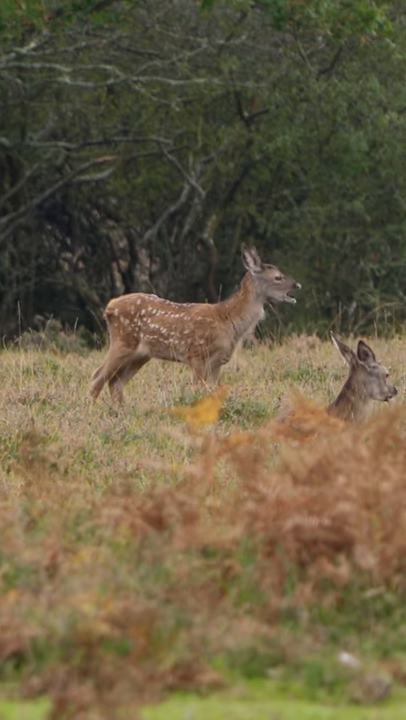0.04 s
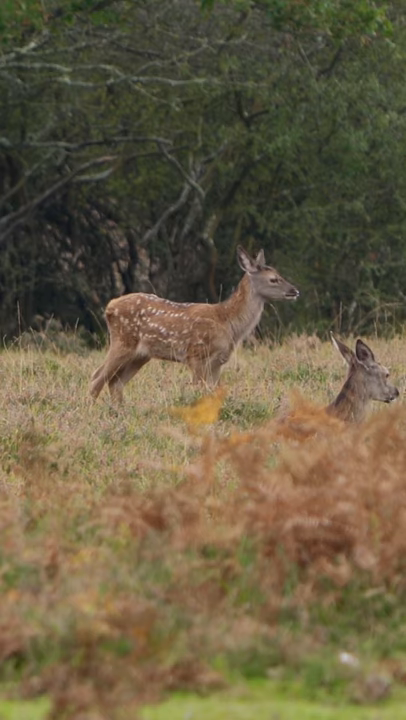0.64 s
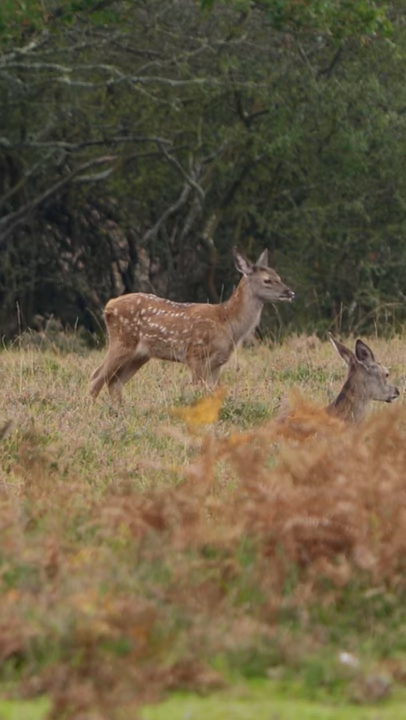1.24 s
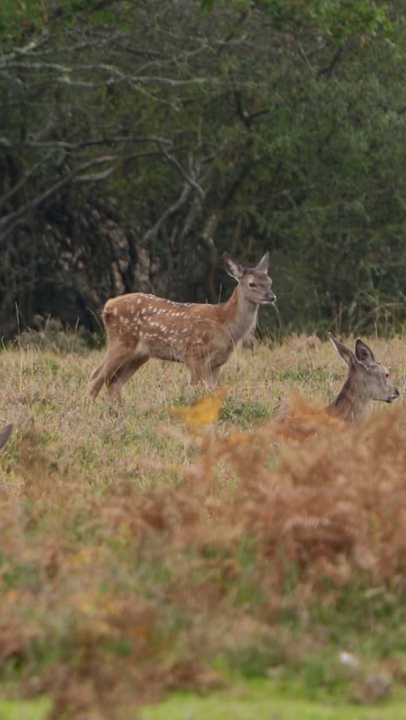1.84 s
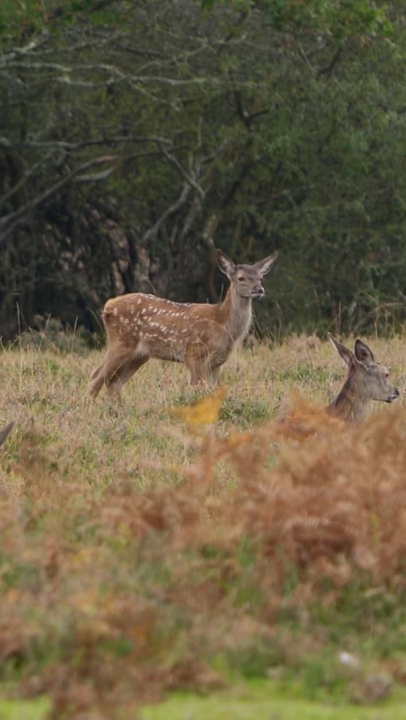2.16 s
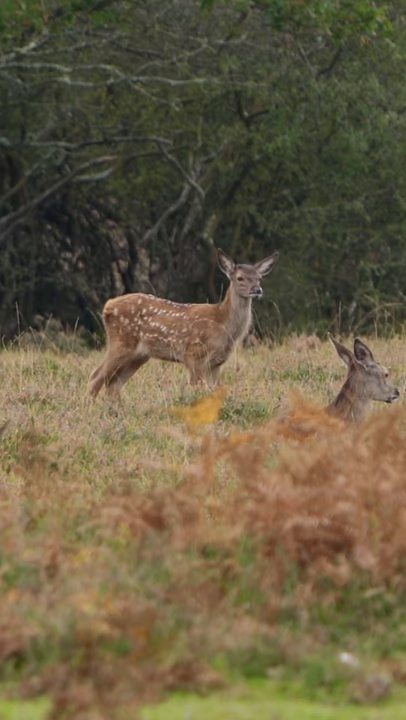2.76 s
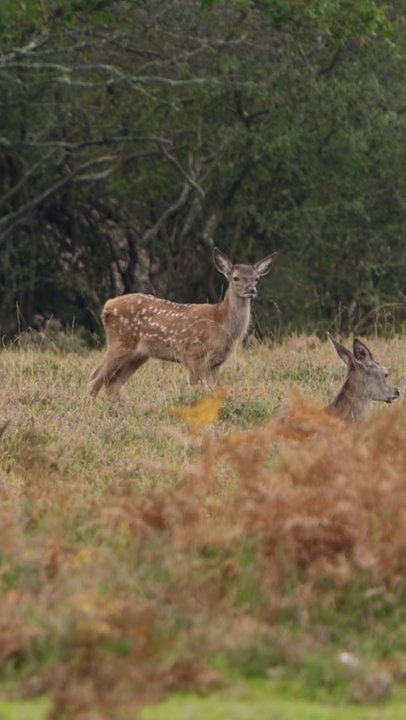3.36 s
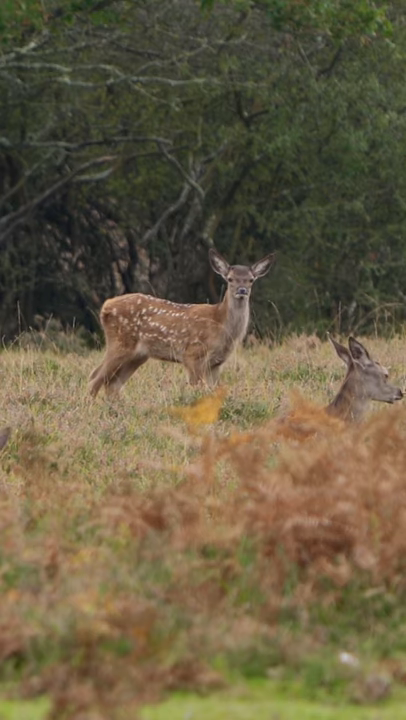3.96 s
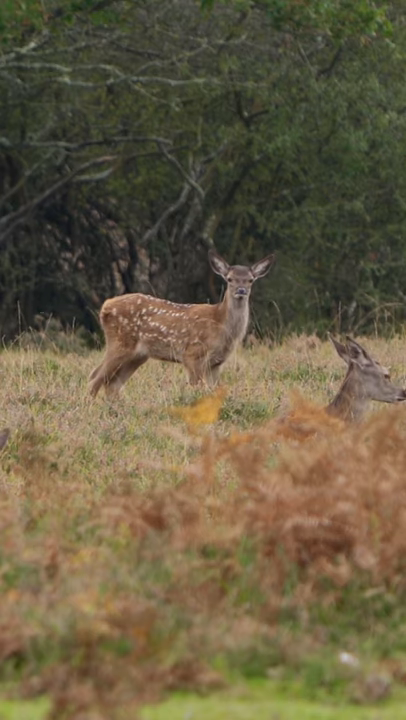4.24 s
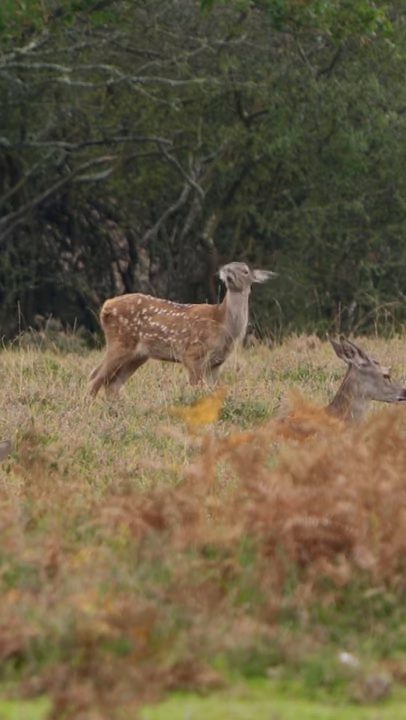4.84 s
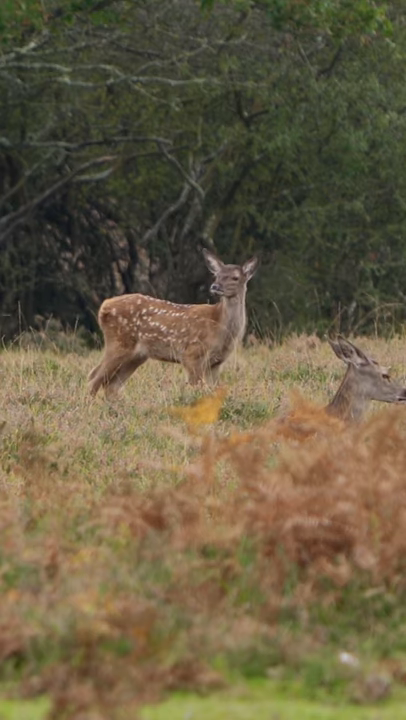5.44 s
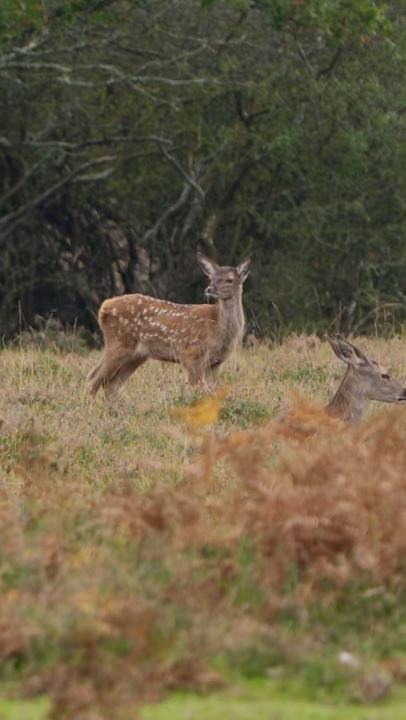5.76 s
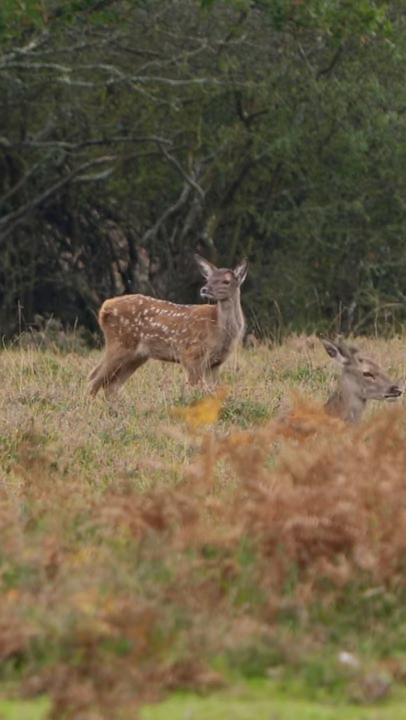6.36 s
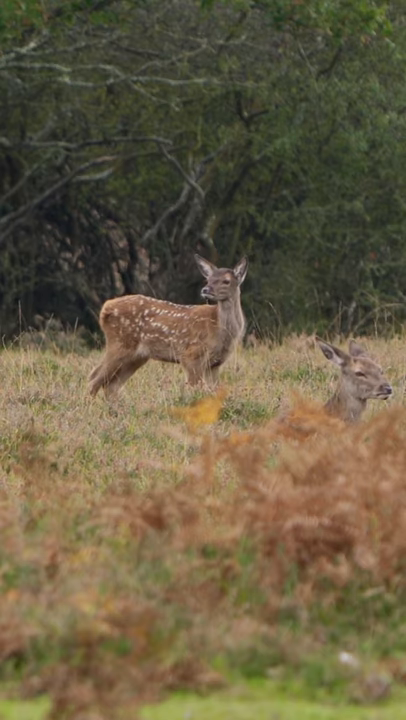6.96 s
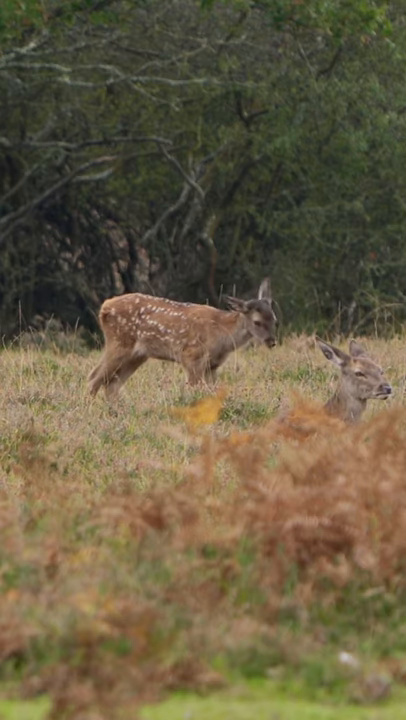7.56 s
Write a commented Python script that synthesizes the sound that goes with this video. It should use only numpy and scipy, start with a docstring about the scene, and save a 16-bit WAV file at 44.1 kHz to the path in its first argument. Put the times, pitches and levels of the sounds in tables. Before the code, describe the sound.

A nearby songbird opens with two quick warbled phrases. Another bird gives a sharp buzzy call, then the first runs through a thin, very high twitter and ends in a short reedy flourish. Farther birds whistle and tick throughout, and the buzzy call returns near the end. The notes echo lightly among trees, over a steady hiss and a faint far rush of air.

```python
"""A near songbird warbles low, runs through a thin high twitter and ends in a reedy flourish.
Another gives two sharp buzzy calls, and farther birds whistle and tick in a wood on a still day.
Each note is a gliding oscillation of the syrinx, modulated at random in pitch and level; the trees
scatter it into reverberation. A soft wash of hiss swells beneath the twitter, and under it all lie
a faint far rush of air and a steady hiss."""
import sys
import numpy as np
from scipy import signal
from scipy.fft import rfft, irfft, next_fast_len
from scipy.io import wavfile
from scipy.ndimage import map_coordinates

SR = 44100
rng = np.random.default_rng(int(sys.argv[2]) if len(sys.argv) > 2 else 0)


def materialize(psi):
    """Save the field psi as 16-bit PCM at rate SR to the path in sys.argv[1].

    A 1-D psi becomes a single channel; in a 2-D psi each row is a channel.
    """
    bounded = np.clip(np.atleast_2d(psi).T, -1, 1)
    quanta = np.round(bounded * 32767).astype(np.int16)
    wavfile.write(sys.argv[1], SR, quanta)


N = 335601


def near_songbird():
    """Close to a source the direct sound dominates; the forced flourish stirs a longer echo."""
    song = among_trees(chips() + warble() + twitter(), direct_db=0.13,
                       branches=(-14.5, 0.22, 0.44), wood=(-20, 0.62, 0.7))
    ending = among_trees(flourish(), direct_db=-0.7, branches=(-13, 0.25, 0.16), wood=(-20, 1.0, 0.5))
    return song + ending


def chips():
    """Brevity and fast modulation widen a tone's band: scratchy chips open each warble phrase."""
    # chips: start_s, length_s, level_db, first_hz, last_hz
    chip_notes = [(.060, 0.0059, -37, 4050, 4200), (.081, 0.0051, -38, 3690, 4660),
                  (.302, 0.0074, -45, 4000, 3240), (.309, 0.0068, -38.5, 3840, 3630),
                  (.325, 0.0047, -45, 4070, 4670)]
    return sing(glides(chip_notes, bend=1.0), edge_s=0.0031, waver=0.029, waver_per_s=1100,
                flutter_db=3.0, overtones_db=(-24,), rasp_db=-35)


def warble():
    """Nearly sinusoidal oscillation of the syrinx: two phrases of hook, swell and fading tail."""
    # hooks that leap up and sag: start_s, length_s, level_db, first_hz, last_hz
    hooks = [(.086, 0.032, -26.5, 4500, 4014), (.329, 0.031, -30.5, 4450, 3627)]
    # swelling whistles: same columns
    swells = [(.139, .062, -26.5, 4420, 4760), (.370, .066, -28, 3820, 4200)]
    # tails, overlapping where both sides of the syrinx sound: same columns
    tails = [(.200, 0.032, -37, 4980, 4520), (.419, .054, -40.5, 4580, 4744),
             (.436, 0.026, -40, 4060, 3804), (.472, .017, -37, 4870, 4350)]
    notes = (glides(hooks, bend=2.4, attack=0.38, rise_db=1, release=0.6, fall_db=11, scoop=0.2)
             + glides(swells, bend=4.13, attack=0.82, rise_db=11.5, release=0.18, fall_db=6)
             + glides(tails, bend=0.9, attack=0.13, rise_db=0.5, release=1.0, fall_db=6.5, scoop=0.033))
    return sing(notes, edge_s=0.0021, waver=0.0022, waver_per_s=450,
                flutter_db=1.5, overtones_db=(-30, -40), rasp_db=-32.5)


def twitter():
    """A high fundamental almost free of harmonics sounds thin: a quaver, then slurs and pips."""
    # quavering lead-in: time_s, pitch_hz, level_db
    quaver = [(2.932, 7103, -41.5), (2.946, 7680, -37), (2.956, 7203, -36.5), (2.974, 6980, -29.5),
              (2.986, 7590, -32), (3.009, 7270, -25)]
    # swelling slurs: start_s, length_s, level_db, first_hz, last_hz
    slurs = [(3.011, 0.059, -24, 7390, 7680), (3.135, 0.066, -30.5, 6994, 7340),
             (3.304, 0.059, -22, 7560, 7320), (3.371, 0.035, -24, 7560, 7750),
             (3.491, 0.028, -26.5, 8110, 7420), (3.507, 0.05, -26, 7320, 7760)]
    # higher, abrupt pips: same columns
    pips = [(3.102, 0.024, -21, 8030, 8240), (3.208, 0.037, -23, 7870, 7760),
            (3.272, 0.026, -23.5, 7890, 8095), (3.410, 0.026, -22.5, 7740, 7900),
            (3.463, .028, -23.5, 8020, 8210), (3.562, .051, -19.5, 7845, 7550)]
    notes = ([winding(quaver)]
             + glides(slurs, bend=1.2, attack=0.72, rise_db=9.5, release=0.16, fall_db=4, droop=0.025)
             + glides(pips, bend=0.98, attack=0.15, rise_db=4, release=0.55, fall_db=5.5,
                      scoop=0.0073, droop=0.039))
    return sing(notes, edge_s=0.0059, waver=0.0088, waver_per_s=221,
                flutter_db=1.86, overtones_db=(-34,), rasp_db=-58)


def flourish():
    """Forcing the syrinx strengthens its harmonics and rasp, so the timbre turns reedy."""
    # two long notes, a curve each: time_s, pitch_hz, level_db
    reedy_curves = [
        [(3.694, 3219, -52.5), (3.702, 3435, -34), (3.712, 3210, -32), (3.716, 3230, -30.5), (3.724, 4017, -36),
         (3.732, 3469, -38.5), (3.74, 3370, -38.5), (3.75, 3750, -32.5), (3.758, 3800, -38.5)],
        [(3.813, 3900, -33.5), (3.823, 3287, -30.5), (3.833, 3037, -31), (3.841, 2885, -42), (3.853, 2755, -35),
         (3.859, 2724, -35.5), (3.869, 3055, -38), (3.879, 2930, -55.5), (3.885, 2860, -51)],
    ]
    # quick flicks between and after them: start_s, length_s, level_db, first_hz, last_hz
    flicks = [(3.767, 0.0052, -32.5, 3770, 3440), (3.798, 0.0091, -45.5, 2620, 3200),
              (3.927, .016, -40, 2590, 3960)]
    notes = [winding(curve) for curve in reedy_curves]
    notes += glides(flicks, bend=-0.38, attack=0.76, rise_db=6.5)
    return sing(notes, edge_s=0.0014, waver=0.016, waver_per_s=850,
                flutter_db=1.34, overtones_db=(-25, -16.5, -14.5, -21), rasp_db=-26.5)


def syrinx(pitch, levels_db, edge_s, waver, waver_per_s, flutter_db, overtones_db=(), rasp_db=-90):
    """An oscillator under random frequency and amplitude modulation, with harmonics and air noise."""
    pitch, levels_db = (np.pad(v, int(edge_s * SR / 2), mode="edge") for v in (pitch, levels_db))
    t = np.arange(len(pitch)) / SR
    hz = pitch * (1 + waver * wander(t, waver_per_s))
    phase = 2 * np.pi * np.cumsum(hz) / SR
    tone = np.sin(phase)
    for k, level_db in enumerate(overtones_db, 2):
        tone += from_db(level_db + 2 * wander(t, waver_per_s)) * np.sin(k * phase) * (k * hz < SR / 2)
    air = np.diff(rng.standard_normal(SR // 2), 2)[:len(t)] / 2   # differencing favours the treble
    opening = np.sin(np.pi / 2 * np.clip(np.minimum(t, t[-1] - t) / edge_s, 0, 1)) ** 2
    gain = from_db(levels_db + flutter_db * wander(t, waver_per_s / 2))
    return np.sqrt(2) * gain * opening * (tone + from_db(rasp_db) * air)


def glides(rows, bend, attack=0.3, rise_db=0, release=0.3, fall_db=0, scoop=0, droop=0, lift=0):
    """Exponential glides as notes (start, pitch, levels, ...); more bend settles the pitch sooner.
    Attack and release are fractions of the length; scoop, droop and lift, of the pitch."""
    scoop_s, droop_s = 0.0022, 0.003
    notes = []
    for start, length, level_db, first_hz, last_hz, *rest in rows:
        t = np.arange(int(length * SR)) / SR
        progress = t / t[-1]
        hz = first_hz + (last_hz - first_hz) * np.expm1(-bend * progress) / np.expm1(-bend)
        scoop_in = scoop * np.exp(-t / scoop_s)
        droop_out = droop * np.exp((t - t[-1]) / droop_s)
        hz *= 1 + lift * progress ** 3 - scoop_in - droop_out
        onset_db = rise_db * np.maximum(1 - progress / attack, 0) ** 2
        ending_db = fall_db * np.maximum(1 - (1 - progress) / release, 0) ** 2
        notes.append((start, hz, level_db - onset_db - ending_db, *rest))
    return notes


def winding(curve):
    """A note whose frequency and level follow a piecewise linear contour."""
    time_s, hz, level_db = np.transpose(curve)
    t = np.arange(time_s[0], time_s[-1], 1 / SR)
    return time_s[0], np.interp(t, time_s, hz), np.interp(t, time_s, level_db)


def sing(notes, **voice):
    """One bird's notes superpose, cross-fading where they meet."""
    out = np.zeros(N)
    for start, pitch, levels_db in notes:
        add(out, start - voice["edge_s"] / 2, syrinx(pitch, levels_db, **voice))
    return out


def wander(t, per_s):
    """Smooth random modulation of roughly unit spread, through per_s values a second."""
    knots = rng.standard_normal(256)
    return map_coordinates(knots, [t * per_s], order=3, mode="wrap")


def add(track, start_s, sound):
    """Linear superposition of a sound on a track."""
    at = max(int(start_s * SR), 0)
    track[..., at:at + sound.shape[-1]] += sound[..., :N - at]


def from_db(db):
    """Amplitude ratio of a level in decibels."""
    return 10 ** (np.asarray(db) / 20)


def among_trees(sound, direct_db, branches, wood):
    """Scattering adds two exponential reverberant tails, each (level_db, t60_s, stereo_spread)."""
    t = np.arange(SR) / SR
    build_up = 1 - np.exp(-t / 0.0037)
    response = np.zeros((2, SR))
    for level_db, t60_s, spread in branches, wood:
        mid, side = rng.standard_normal((2, SR)) * build_up * from_db(-60 * t / t60_s)
        response += from_db(level_db) * (mid + spread * side * [[1], [-1]]) / np.linalg.norm(mid)
    scattered = signal.fftconvolve(np.atleast_2d(sound), response, axes=1)[:, :N]
    return from_db(direct_db) * sound + scattered


def sharp_caller():
    """Two voices slide down together and beat into a buzz, smeared by scattering in the foliage."""
    # upper voice: start_s, length_s, level_db, first_hz, last_hz
    sharp_calls = [(1.897, 0.045, -36.5, 8450, 7530), (6.843, .045, -37.5, 8350, 7570)]
    lower_delay_s, lower_ratio, lower_db = 0.0039, 0.936, -4
    upper = glides(sharp_calls, bend=2.5, attack=0.45, rise_db=6)
    lower = [(start + lower_delay_s, pitch * lower_ratio, levels_db + lower_db)
             for start, pitch, levels_db in upper]
    calls = sing(upper + lower, edge_s=0.0033, waver=0.019, waver_per_s=1000, flutter_db=3.5)
    return among_trees(from_direction(calls, pan_db=0, lag_s=-2e-5), direct_db=-1,
                       branches=(-6, 0.38, 0.24), wood=(-5, 0.69, 0.42))


def distant_birds():
    """The ratio of direct to reverberant sound falls with distance, blurring the farthest birds."""
    whistles, slurs = far_whistles(), far_slurs()
    return (among_trees(whistles, direct_db=1, branches=(-7, 1.0, 0.44), wood=(-5.5, 0.99, 0.83))
            + among_trees(slurs, direct_db=-4, branches=(-3.5, 0.3, 0.31), wood=(-2.5, 0.95, 0.9)))


def far_whistles():
    """Shallow modulation leaves nearly pure tones, each relaxing towards a pitch."""
    # settling whistles: start_s, length_s, level_db, first_hz, last_hz, pan_db
    whistles = [ (.530, 0.19, -61, 7290, 7130, 3), (1.175, 0.18, -67.5, 7850, 7600, -1),
                (2.090, 0.069, -51, 7280, 6880, -7), (2.225, .088, -52.5, 7290, 7000, -8),
                (2.400, 0.13, -61.5, 7050, 7090, -3), (3.010, 0.053, -69.5, 3390, 3390, -1),
                (3.195, .1, -74.5, 3416, 3285, 0.5), (3.316, 0.018, -61.5, 5230, 4880, -3.5),
                (3.475, 0.04, -65, 5240, 4840, -3.5), (3.893, .03, -60, 2930, 2493, 0),
                (3.995, 0.029, -67, 2043, 2310, 0), (4.495, 0.096, -59.5, 4295, 4347, -1.5),
                (4.650, 0.055, -60, 4980, 5290, -5), (4.858, 0.049, -55, 5160, 5070, -5),
                (5.785, 0.048, -55.5, 8370, 8210, 2), (7.185, .12, -65, 5050, 4670, -4),
                (7.330, 0.055, -59, 5290, 5245, -4.5), (7.470, 0.074, -59, 5140, 5260, -5.5)]
    # swoops that dip and lift again: start_s, length_s, level_db, first_hz, dip_hz, pan_db
    swoops = [(1.162, .155, -55.5, 5620, 4770, 4), (6.678, 0.15, -56.5, 5740, 4690, 4.5)]
    notes = (glides(whistles, bend=4.1, attack=0.2, rise_db=3.5, release=0.35, fall_db=4.5)
             + glides(swoops, bend=8.2, release=0.7, fall_db=6, lift=0.071))
    return chorus(notes, edge_s=0.0082, waver=0.0035, waver_per_s=400, flutter_db=1.65)


def far_slurs():
    """Deep, fast modulation spreads short calls from far in the wood into noisy sidebands."""
    # blurred slurs: start_s, length_s, level_db, first_hz, last_hz, pan_db
    slurs = [ (0, 0.026, -47, 5710, 5130, -0.5), (1.445, 0.086, -66, 5330, 4960, -3),
             (2.245, 0.021, -64.5, 3390, 5030, 0.5), (2.281, 0.017, -62.5, 5200, 3600, 0.5),
             (2.380, 0.027, -65.5, 5100, 5000, 0), (2.575, 0.068, -61.5, 7430, 7450, -4),
             (3.075, 0.084, -61.5, 5950, 5230, -5.5), (3.635, 0.028, -58.5, 5260, 4860, -4.5),
             (4.075, 0.044, -56.5, 5660, 3910, -2.5), (4.285, 0.055, -65, 3374, 3600, -1),
             (5.070, 0.044, -63.5, 6350, 6440, -6.5), (5.870, 0.088, -63, 7670, 7650, -3)]
    # thin falling calls of one shape: start_s, level_db
    tsip_onsets = [(0.948, -62.5), (3.901, -54.5), (4.219, -59), (4.715, -58.5), (4.926, -60),
                   (5.987, -56.5)]
    tsips = [(start, 0.052, level_db, 8370, 7050, -2.5) for start, level_db in tsip_onsets]
    run_gap_s, tick_gap_s, slowing_s = 0.153, 0.135, 0.0065
    even_run = [(5.126 + k * run_gap_s, 0.041, -56, 6300, 4190, -4) for k in range(5)]
    ticks = [(0.15 + k * tick_gap_s + k ** 2 * slowing_s, 0.012, -75.5, 2633, 1950, 0) for k in range(9)]
    notes = glides(slurs + tsips + even_run + ticks, bend=0.3,
                   attack=0.28, rise_db=2, release=0.25, fall_db=4.5)
    return chorus(notes, edge_s=0.0042, waver=0.028, waver_per_s=1100, flutter_db=4.5)


def chorus(notes, **voice):
    """Notes of several birds superpose, each from its own direction."""
    lag_s_per_db = 7.1e-6
    out = np.zeros((2, N))
    for start, pitch, levels_db, pan_db in notes:
        call = syrinx(pitch, levels_db, **voice)
        add(out, start, from_direction(call, pan_db, pan_db * lag_s_per_db))
    return out


def from_direction(sound, pan_db, lag_s):
    """Direction is heard as differences of level and arrival time, both left minus right."""
    n = np.arange(len(sound))
    shift = lag_s * SR / 2
    left = from_db(pan_db / 2) * map_coordinates(sound, [n - shift], order=3)
    right = from_db(-pan_db / 2) * map_coordinates(sound, [n + shift], order=3)
    return np.array([left, right])


def wash():
    """Band-limited noise swells and fades just below the pitch of the twitter."""
    # spectral density of the hiss: frequency_hz, relative_db
    wash_spectrum = [(500, -82), (2500, -31.5), (4000, -15), (5200, -3.5), (6600, 2), (8000, -11.5),
                     (11000, -33.5)]
    # its envelope: time_s, level_db
    wash_envelope = [(3.0, -100), (3.12, -70.5), (3.3, -63.5), (3.55, -65), (3.85, -59.5), (4.2, -100)]
    level_db = np.interp(np.arange(N) / SR, *np.transpose(wash_envelope))
    return from_db(level_db) * coloured_noise(wash_spectrum)[0]


def background():
    """The broadband noise floor: far air swells slowly under an even microphone hiss."""
    # spectral density of the rush of air: frequency_hz, relative_db
    air_spectrum = [(25, -33.5), (100, -32), (150, -25.5), (180, -15), (230, -21.5), (450, -17.5),
                    (700, -6), (1000, 2), (1500, -4), (2500, -22)]
    # its envelope: time_s, level_db
    air_envelope = [(0, -85.5), (1.7, -85.5), (3.2, -84.5), (4.5, -86), (7.6, -86.5)]
    # spectral density of the hiss: frequency_hz, relative_db
    hiss_spectrum = [(100, -55), (1000, -33.5), (2000, -19), (3200, -13.5), (4500, -7), (6300, -3),
                     (8500, -2), (12500, -4), (15500, -4.5)]
    hiss_db = -57
    air_db = np.interp(np.arange(N) / SR, *np.transpose(air_envelope))
    air = from_db(air_db) * coloured_noise(air_spectrum)
    return air + from_db(hiss_db) * coloured_noise(hiss_spectrum)


def coloured_noise(spectrum):
    """Spectral shaping of white noise, uncorrelated between the two channels; rms 1."""
    hz, level_db = np.transpose(spectrum)
    size = next_fast_len(N, real=True)
    bin_hz = np.maximum(np.arange(size // 2 + 1) * SR / size, 1)
    gain = from_db(np.interp(np.log(bin_hz), np.log(hz), level_db))
    white = rng.standard_normal((2, size))
    noise = irfft(rfft(white) * gain, size)[:, :N]
    return noise / np.sqrt(np.mean(noise ** 2))


def scene():
    """Sound pressures add: all the birds over the quiet background."""
    return near_songbird() + sharp_caller() + distant_birds() + wash() + background()


def record(dry):
    """A steep elliptic low-pass filter limits the bandwidth."""
    cutoff_hz = 15900
    return signal.sosfilt(signal.ellip(12, 0.1, 80, cutoff_hz, fs=SR, output="sos"), dry)


dry = scene()
out = record(dry)
materialize(out)
```